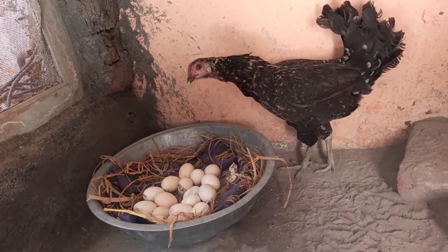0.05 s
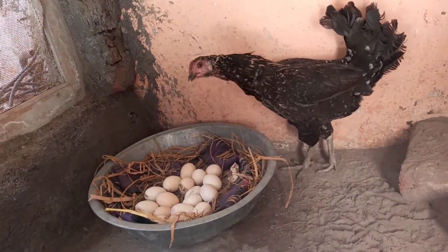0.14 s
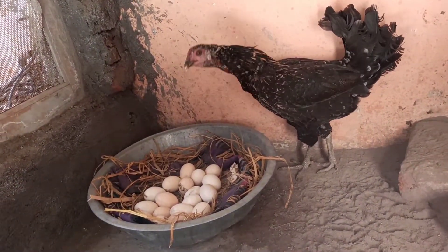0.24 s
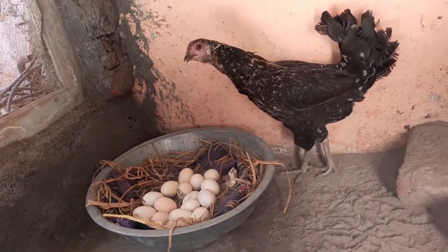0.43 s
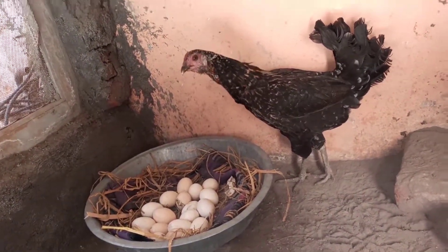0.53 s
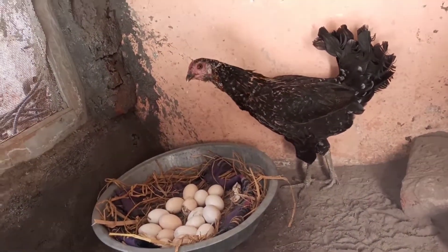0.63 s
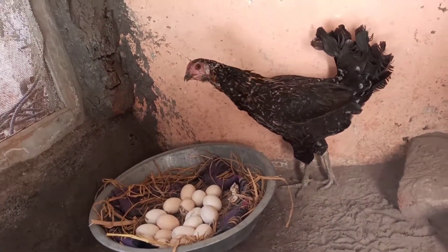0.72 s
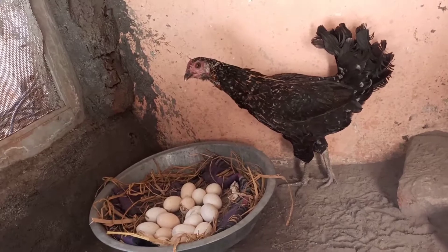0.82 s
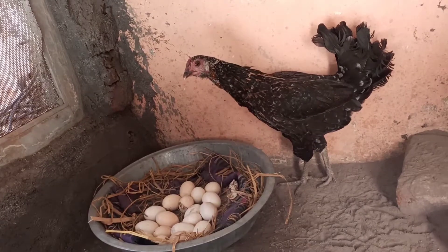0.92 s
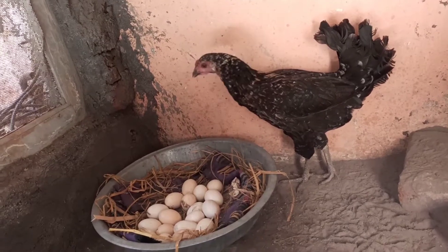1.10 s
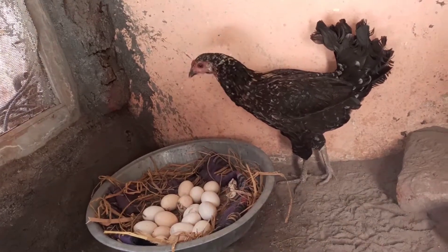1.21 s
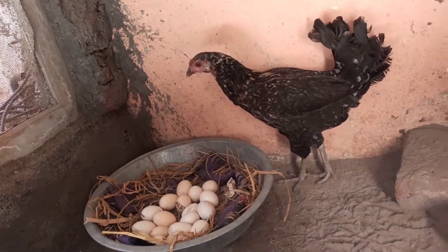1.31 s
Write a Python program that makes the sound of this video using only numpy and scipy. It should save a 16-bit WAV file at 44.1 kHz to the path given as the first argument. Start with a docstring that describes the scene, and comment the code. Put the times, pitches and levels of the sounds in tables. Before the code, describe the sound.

A hen gives two soft clucks, a loud harsh squawk, another cluck, then a low moan

```python
"""A hen in a small hard-walled coop, close to a two-microphone camera, over faint room noise throughout.
First come two soft clucks, then one harsh squawk that breaks into rasp, then a third cluck.
A long throbbing groan sinks in pitch, and a last faint cluck is cut off by the end.
Each call is a sum of partials mixed with puffs of noise; clucks and squawk start on a shut-beak note.
The walls answer with a few early echoes and a short bright tail of sparse random taps."""
import sys
import numpy as np
from scipy import signal
from scipy.io import wavfile
from scipy.ndimage import uniform_filter1d

SR = 44100
rng = np.random.default_rng(int(sys.argv[2]) if len(sys.argv) > 2 else 0)


def nominal_scale(level):
    """Amplitude ratio for a level in decibels (scalar or array-like)."""
    x = np.asarray(level, float) / 20
    return 10 ** x


def output_pcm(signal):
    """Save a mono or channel-first signal as 16-bit PCM at the path in sys.argv[1].

    Samples are clipped to [-1, 1] before scaling.
    """
    pcm = np.clip(np.atleast_2d(signal).T, -1, 1) * 32767
    wavfile.write(sys.argv[1], SR, np.round(pcm).astype(np.int16))


N = 59535  # samples, 1.35 s


def evened(x):
    """Scales to rms 1."""
    return x / np.sqrt(np.mean(x ** 2) + 1e-20)


def read(points, hz):
    """Reads a spectrum on a log-frequency axis."""
    f, value = np.transpose(points)
    return np.interp(np.log(hz + 1), np.log(f + 1), value)


def add(mix, s, sound):
    """Mixes a sound in at s seconds, cut off where the mix ends."""
    part = mix[round(s * SR):][:len(sound)]
    part += sound[:len(part)]


def drift(size, hz):
    """Slow random wander of about rms 1, up to about hz: noise smoothed twice."""
    width = max(round(SR / hz / 2), 2)
    noise = rng.standard_normal(8192 + size)
    smooth = uniform_filter1d(uniform_filter1d(noise, width), width)
    return evened(smooth)[4096:4096 + size]


def coloured(x, points):
    """Causal minimum-phase filter with the given spectrum."""
    hz = abs(np.fft.fftfreq(4096, 1 / SR))
    log_gain = np.log(nominal_scale(np.maximum(read(points, hz), -100)))
    taps = np.fft.ifft(np.exp(np.conj(signal.hilbert(log_gain)))).real[:2048]
    return signal.oaconvolve(x, taps)[:len(x)]


def air():
    """Faint room noise: two partly alike channels of random spectra with drifting patches."""
    # colour of the room noise: (frequency [Hz], relative level [dB])
    air_colour = [(18, -42), (30, 4.5), (83, -7.5), (148, -2), (332, -5.5), (399, -1.5), (1550, -18),
                  (2830, -19), (3400, -21.5), (3880, -28.5), (7650, -26), (8950, -29), (15500, -29.5)]
    # left-right likeness, held within -1 to 1 below: (frequency [Hz], likeness [-])
    air_likeness = [(60, 0.54), (240, 0.63), (950, 0.17), (3770, 0.42), (15000, -1.05)]
    air_db, patch_db = -51.5, 2.5  # overall rms level, patch depth
    frames, hz = N // 256 + 5, np.fft.rfftfreq(1024, 1 / SR)
    a, b, c, d, patches = rng.standard_normal((frames, 513, 5)).T
    patches = evened(uniform_filter1d(uniform_filter1d(patches, 8, 0), 12, 1))
    same = np.clip(read(air_likeness, hz), -1, 1)[:, None]
    left = a + 1j * b
    right = same * left + np.sqrt(1 - same ** 2) * (c + 1j * d)
    z = np.array([left, right])
    z *= nominal_scale(read(air_colour, hz)[:, None] + patch_db * patches)
    noise = signal.istft(z, nperseg=1024, noverlap=768)[1][:, :N]
    return nominal_scale(air_db) * evened(noise)


def voice(t, hz, rough, tone, rasp, jitter=.01, odd=1., beat=0., beat_hz=100., pull=0., partials=25):
    """Partials on a wavering pitch plus puffs of noise each cycle.

    A slower second membrane beats the level of both and pulls their phase."""
    other = 2 * np.pi * np.cumsum(beat_hz * (1 + 0.062 * drift(len(t), 25))) / SR
    wavering_hz = hz * (1 + jitter * (1 + 3 * rough) * drift(len(t), 130))
    turns = np.cumsum(wavering_hz) / SR + pull * np.sin(other + 0.53)
    folds = 0
    for k in range(1, partials + 1):
        gain = nominal_scale(read(tone, k * hz)) * (odd if k % 2 else 1)
        folds = folds + gain * np.cos(2 * np.pi * k * turns - .6 * k - 0.06 * k * k)
    # each puff bursts at the start of a cycle and dies away within it
    puff_shape = 0.52 + np.exp(-(turns % 1) / 0.13)
    puffs = coloured(puff_shape * rng.standard_normal(len(t)), rasp)
    rough = np.clip(rough, 0, 1)
    mixed = np.sqrt(1 - rough) * evened(folds) + np.sqrt(rough) * evened(puffs)
    return evened(mixed * np.exp(beat * np.cos(other)))


def beak(t, wide, shut_hz, shut_db):
    """One ringing note gives way to the full voice as the beak opens."""
    open_s = 0.0079
    since = t - t[0]
    mouth = np.clip(since / open_s, 0, 1) ** 2
    shut = (1 - mouth) * nominal_scale(shut_db) * np.sin(2 * np.pi * shut_hz * since)
    return mouth * wide, shut


def cluck(start, length, effort_db, hz, rough, shut_hz, shut_db, throat):
    """A few low, climbing pulses that swell and stop short."""
    rise_s, fall_s, shut_rise_s = .018, .004, .004
    climb = .1  # fraction by which the pitch rises
    t = np.arange(0, length, 1 / SR)
    pitch = hz * (1 + climb * t / length)
    wide = voice(t, pitch, rough, throat, throat, jitter=.01, beat=.3, beat_hz=110, partials=37)
    wide, shut = beak(t, wide, shut_hz, shut_db)
    shape = np.minimum(np.minimum(t / rise_s, 1), (length - t) / fall_s)
    return start, nominal_scale(effort_db) * (shape * wide + np.minimum(t / shut_rise_s, 1) * shut)


def coop(x):
    """Direct sound, a few wall echoes, and a tail of sparse random taps dying by band."""
    # decay of the tail: (frequency [Hz], time to fall 60 dB [s])
    coop_decay = [(150, 0.55), (600, 0.22), (1500, 0.21), (3500, 0.23), (9000, 0.14)]
    # left-right likeness of the tail: (frequency [Hz], likeness [-])
    tail_likeness = [(150, 1), (500, 0.33), (1200, 0.9), (3000, 0.05)]
    # near walls and floor: (delay [s], left gain [-], right gain [-])
    near_walls = [(.0011, 0.53, 0.27), (.0023, 0.18, 0.44), (.0041, 0.49, 0.35), (.0068, 0.2, 0.0071),
                  (0.012, -0.064, 0.41)]
    tail_db, right_late_s = -9.5, .0002  # left tail against direct sound; lag of the right microphone
    taps = np.zeros((2, SR // 2))
    slots = np.arange(400, SR // 2 - 20, 20)
    at = slots + rng.integers(0, 20, (2, len(slots)))
    np.put_along_axis(taps, at, rng.choice([-1., 1.], at.shape), 1)
    hz, t, z = signal.stft(taps, SR, nperseg=256)
    same = np.clip(read(tail_likeness, hz), 0, 1)[:, None]
    z[1] = same * z[0] + np.sqrt(1 - same ** 2) * z[1]
    t60 = np.maximum(read(coop_decay, hz), .05)[:, None]
    tail = signal.istft(z * nominal_scale(-60 * t / t60), SR, nperseg=256)[1]
    tail *= nominal_scale(tail_db) / np.linalg.norm(tail[0])
    tail[0, 0], tail[1, round(right_late_s * SR)] = 1, 1  # direct sound
    for s, left, right in near_walls:
        tail[:, round(s * SR)] += left, right
    return signal.fftconvolve(x[None], tail, axes=1)[:, :N]


def squawk():
    """Loud held cry, two membranes beating, that breaks into rasp at its start, middle and end."""
    # swell of the cry: (time [s], level [dB])
    squawk_swell = [(.231, -43.5), (.235, -14.5), (.245, -10.5), (0.272, -17), (.292, -9), (0.302, -16.5),
                    (0.326, -10), (0.34, -15), (.356, -10), (0.38, -14), (.408, -15.5), (0.413, -71)]
    # pitch track: (time [s], pitch [Hz], roughness [0-1])
    squawk_track = [(.231, 538, .3), (.245, 546, .6), (.258, 550, .14), (.272, 551, .14), (.288, 549, .5),
                    (.304, 552, .14), (.33, 559, .1), (.343, 556, .3), (.356, 563, .1), (.378, 571, .14),
                    (.395, 570, .45), (.416, 568, .4)]
    # partials: (frequency [Hz], relative level [dB])
    squawk_partials = [(560, -21.5), (1120, -2.5), (1680, -21), (2240, -14), (2800, -15), (3360, -28.5),
                       (3920, -18), (4480, -20), (5300, -36.5), (6100, -31.5), (6900, -19), (7400, -23),
                       (8200, -30.5), (12000, -41.5), (15000, -39)]
    # breathy rasp: (frequency [Hz], relative level [dB])
    squawk_breath = [(180, -44), (300, -30.5), (1020, -11), (1120, -6.5), (1280, -6.5), (2210, -17.5),
                     (2440, -17.5), (2790, -13), (7370, -42), (8560, -37), (10100, -115), (11900, -53.5),
                     (15500, -49)]
    s, db = np.transpose(squawk_swell)
    at, hz, rough = np.transpose(squawk_track)
    t = np.arange(s[0], s[-1], 1 / SR)
    wide = voice(t, np.interp(t, at, hz), np.interp(t, at, rough), squawk_partials, squawk_breath,
                 jitter=.0023, beat=0.27, beat_hz=74.27, pull=.02)
    wide, shut = beak(t, wide, shut_hz=826, shut_db=7)
    return s[0], nominal_scale(np.interp(t, s, db)) * (wide + shut)


def groan():
    """Soft sinking moan: its odd partials flutter fast, its even partials throb slowly."""
    # swell of the moan: (time [s], level [dB], gain of the odd partials before flutter [-])
    groan_swell = [(.72, -52, 0.22), (0.729, -36.5, .1), (0.782, -39, 0.13), (0.799, -35, 0.78),
                   (.87, -37, 2.02), (.93, -38, 1.24), (.96, -41.5, 0.59), (0.983, -33, 0.77),
                   (1.04, -36, 1.05), (1.09, -40.5, 2.2), (1.131, -37.5, 1.3), (1.171, -65, 2.8),
                   (1.211, -56, 1.8)]
    # sinking pitch: (time [s], pitch [Hz])
    groan_track = [(.72, 482), (.8, 463), (.87, 446), (.93, 428), (1., 427), (1.06, 414), (1.12, 395),
                   (1.21, 378)]
    # throat colour: (frequency [Hz], relative level [dB])
    groan_colour = [(200, -19), (400, 3.5), (620, -9.5), (900, 1.5), (1320, -6), (1850, -15), (2300, -24.5),
                    (3500, -33), (8000, -45)]
    throb_hz, throb_db, throb_top_s = 18.2, 4.5, .767  # rate, swing each way, time of one peak
    flutter_hz, flutter_depth = 66, 1.3
    s, db, odd = np.transpose(groan_swell)
    t = np.arange(s[0], s[-1], 1 / SR)
    throb = nominal_scale(throb_db * np.cos(2 * np.pi * throb_hz * (t - throb_top_s)))
    flutter_turns = np.cumsum(flutter_hz * (1 + 0.22 * drift(len(t), 36))) / SR
    flutter = 1 + flutter_depth * np.cos(2 * np.pi * flutter_turns)
    # dividing by the throb here keeps it off the odd partials
    odd_gain = np.interp(t, s, odd) * flutter / throb
    pitch = np.interp(t, *np.transpose(groan_track))
    wide = voice(t, pitch, .13, groan_colour, groan_colour, jitter=.006, odd=odd_gain, partials=8)
    return s[0], nominal_scale(np.interp(t, s, db)) * throb * wide


def scene():
    """The hen in its coop over the room noise."""
    # clucks: (start [s], length [s], effort [dB], pitch [Hz], roughness [0-1],
    #          shut-beak note [Hz], its level against effort [dB])
    cluck_calls = [(.076, .022, -37, 225, .22, 950, -3), (.129, .033, -23, 218, .33, 950, 1),
                   (.568, .036, -20.5, 204, .22, 820, -6), (1.342, .03, -38, 230, .3, 480, 0)]
    # throat colour, one list for each cluck: (frequency [Hz], relative level [dB])
    cluck_colours = [
        [(88, -42), (150, -17.5), (985, -7), (1220, -19.5), (1400, -12.5), (2760, -34.5), (2980, -15.5),
         (3410, -44), (15500, -55.5)],
        [(88, -54.5), (150, -60.5), (509, -13.5), (668, -5.5), (1040, -14), (1400, -2.5), (2180, -20),
         (2360, -24.5), (4310, -27), (4840, -46), (7410, -28.5), (10500, -71.5), (11800, -54.5), (15500, -55.5)],
        [(88, -29), (150, -17), (668, -3), (860, -11.5), (1090, -6.5), (2310, -27), (6600, -39), (8330, -35.5),
         (11100, -105), (12000, -42.5), (15500, -62)],
        [(88, -51.5), (150, -54), (519, 5), (1060, -33), (2360, -2.5), (15500, -42)],
    ]
    hen = np.zeros(N)
    for call, throat in zip(cluck_calls, cluck_colours):
        add(hen, *cluck(*call, throat))
    add(hen, *squawk())
    add(hen, *groan())
    return coop(hen) + air()


def band_limit(x):
    """A steep low-pass at the top of the band."""
    return signal.sosfilt(signal.butter(12, 15740, fs=SR, output="sos"), x)


def record(dry):
    """Soft preamp ceiling, then a bass cut; a band of the treble is missing and the top is cut."""
    ceiling, low_cut_hz = .95, 59
    gap_low_hz, gap_high_hz, edge_hz = 8600, 11600, 15600  # missing band, top edge
    driven = ceiling * np.tanh(dry / ceiling)
    high_pass = signal.butter(4, low_cut_hz, "high", fs=SR, output="sos")
    thinned = signal.sosfilt(high_pass, driven)
    taps = signal.firwin(1023, [gap_low_hz, gap_high_hz, edge_hz], window=("kaiser", 8), fs=SR)
    mix = signal.oaconvolve(thinned, taps[None], "same")
    return band_limit(mix)


dry = scene()
out = record(dry)
output_pcm(out)
```